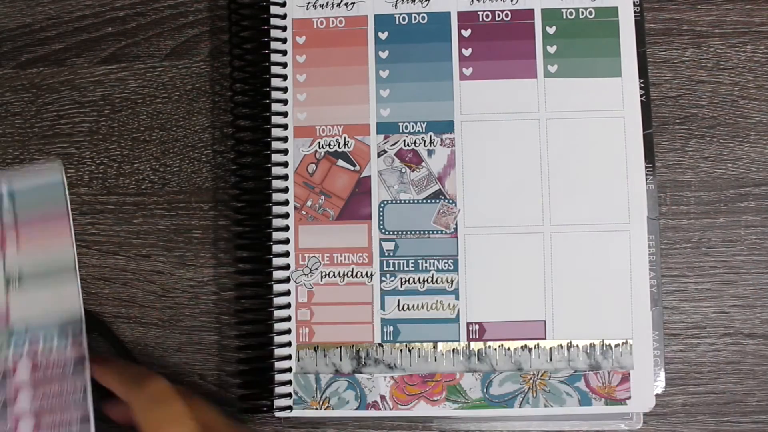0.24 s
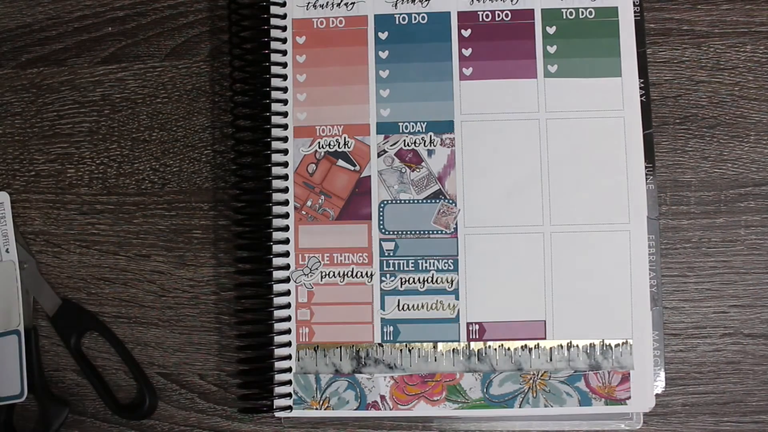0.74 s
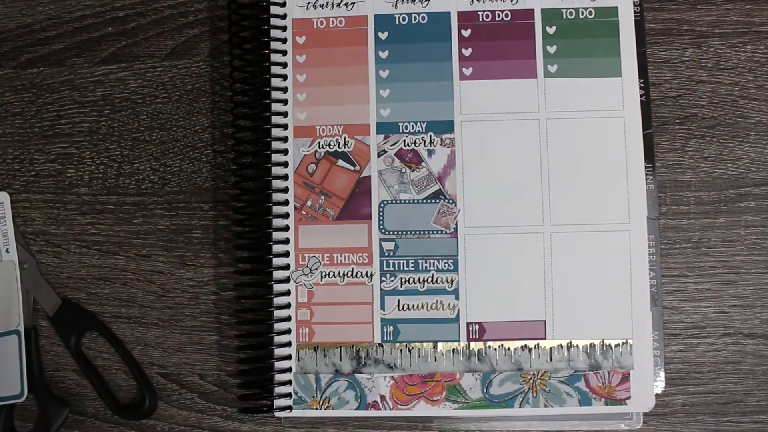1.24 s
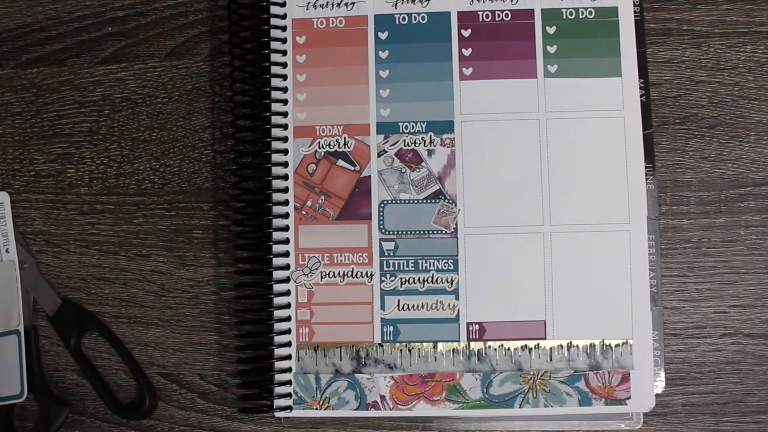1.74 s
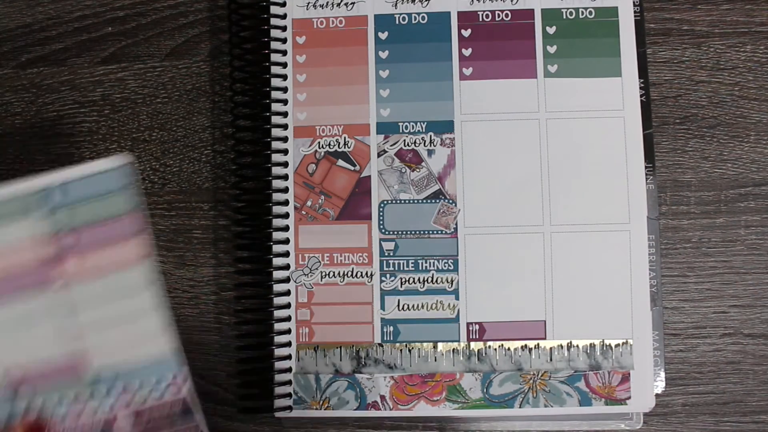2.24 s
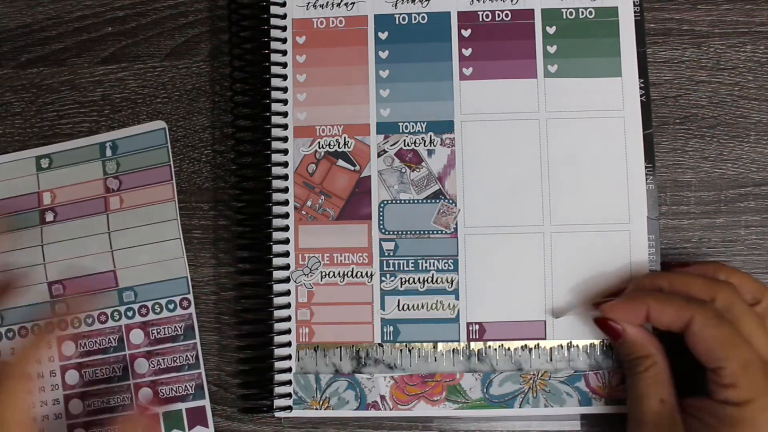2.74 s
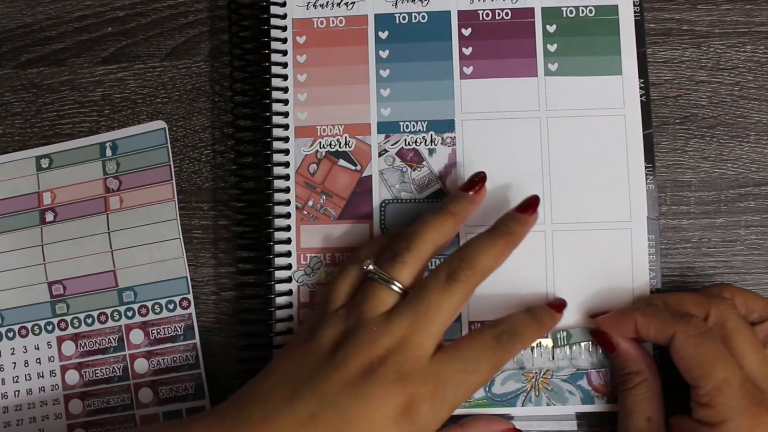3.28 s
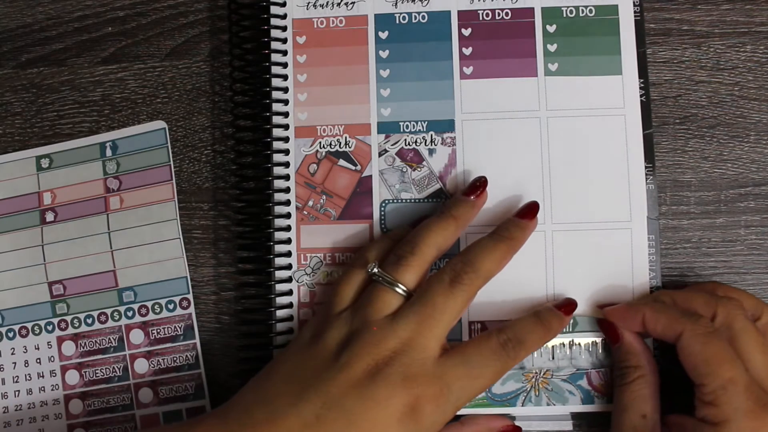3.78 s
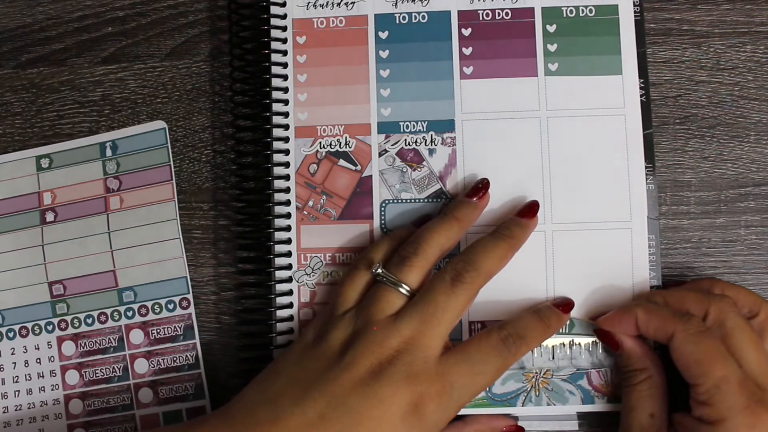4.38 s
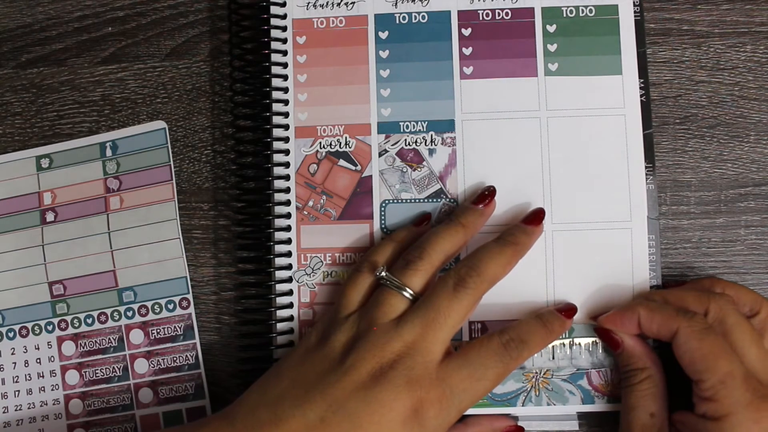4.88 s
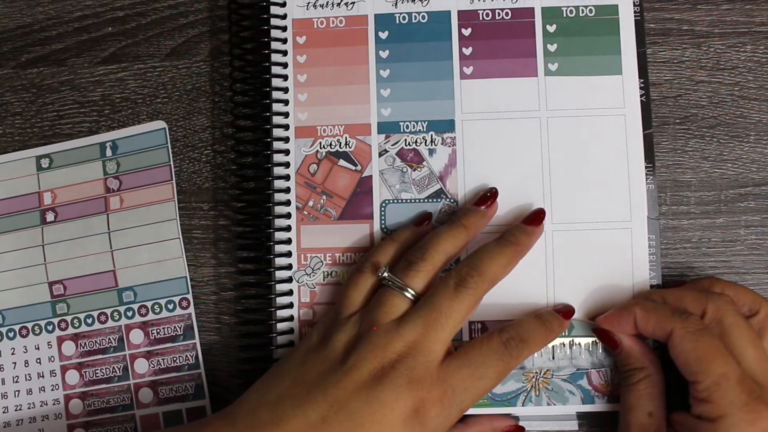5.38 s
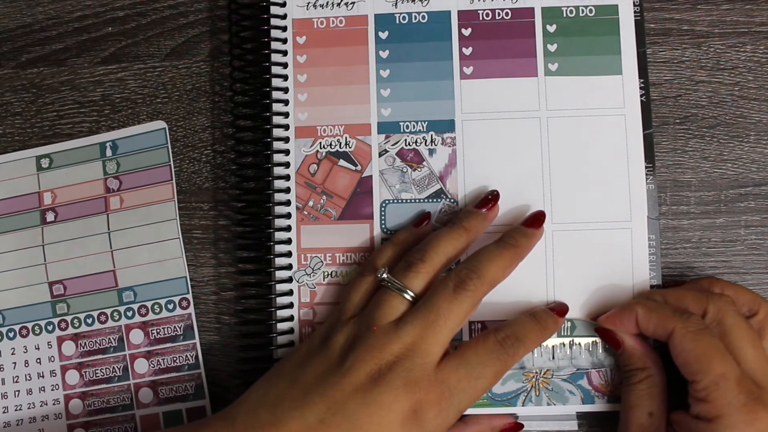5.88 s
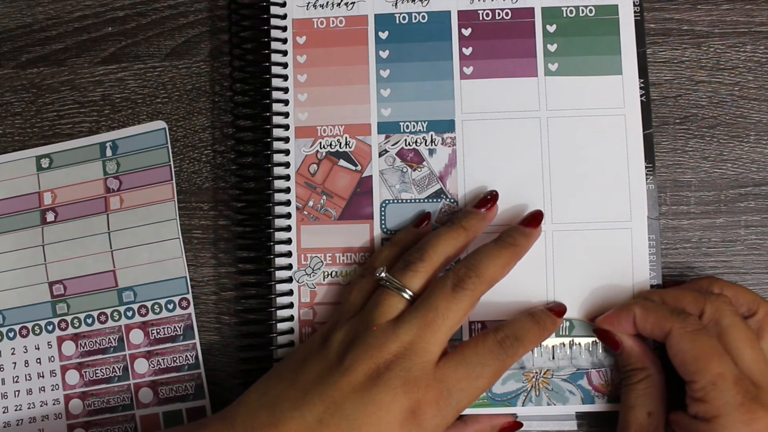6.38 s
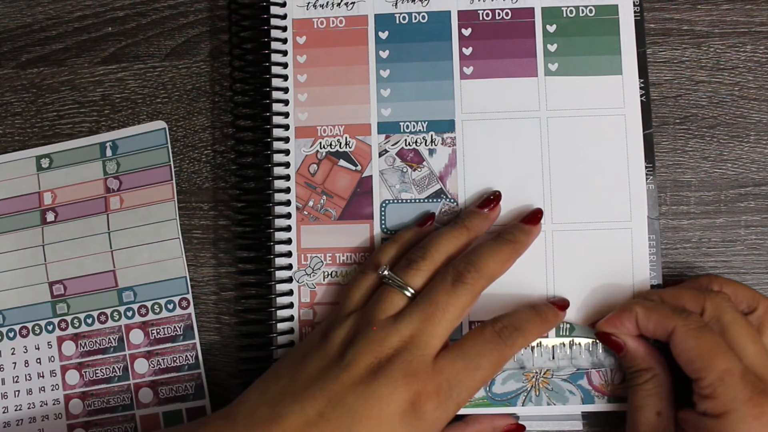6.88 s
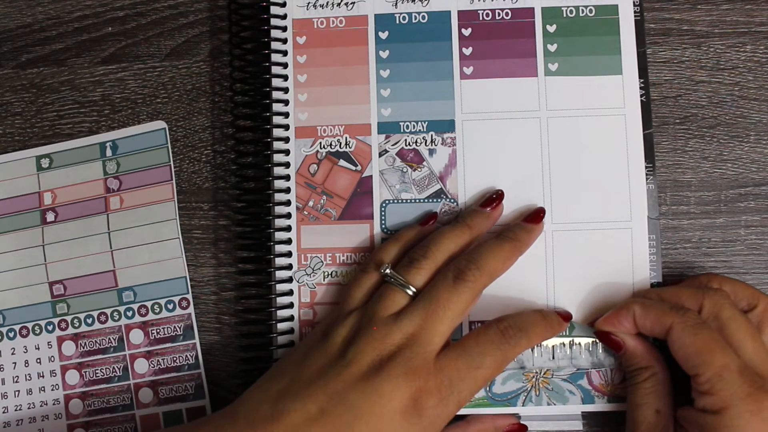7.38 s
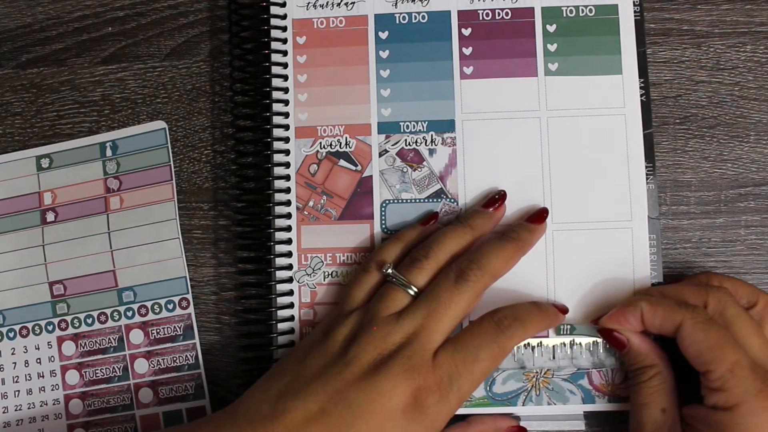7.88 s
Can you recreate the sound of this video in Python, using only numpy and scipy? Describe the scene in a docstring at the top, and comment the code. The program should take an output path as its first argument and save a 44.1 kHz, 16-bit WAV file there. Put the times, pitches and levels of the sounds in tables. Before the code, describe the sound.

A quiet small furnished room, heard close up, with a steady low fan, faint mains hum and light hiss throughout. From 0 to 0.55 seconds stiff sticker sheets rub and flex in quick papery strokes with crisp snaps. A bright sharp tap lands at 0.93, followed by a short rustle. A faint slide swells into a hollow knock on the desk near 1.5. Firm snaps and scrapes come at 1.9 and 2.1, then rustles and clicks from 2.3 to 2.6, fading by 3. Soft low rumble accompanies arm movements. Afterwards it is nearly still: fingernail ticks and sticky crackle around 3.25, fainter ones near 3.95, a bright tick at 4.55, another at 4.65, a small crackly cluster at 5.15, then a long gap. Single light ticks follow at 6.9 and 7.2, and a few tiny ones toward 7.9. The short room tail is barely noticeable.

```python
"""A fan, mains hum and faint hiss run throughout a quiet room, close under one microphone.
First sticker sheets are picked up, slid over each other and laid on a desk: filtered friction clicks make
the rubbing, and short noise bursts through resonances make the buckles, taps and, midway, a hollow knock.
Then fingernails lift and press a small sticker on a planner page: tiny resonant ticks and crackling adhesive.
Arm movements add soft low rumble while the sheets are handled."""
import sys
import numpy as np
from scipy import signal
from scipy.fft import rfft, irfft
from scipy.io import wavfile

SR = 44100
rng = np.random.default_rng(int(sys.argv[2]) if len(sys.argv) > 2 else 0)


def unload_audio(sound):
    """Save the sound as a 16-bit wav file, at the path given as the first command line argument."""
    columns = np.transpose(np.atleast_2d(sound))
    # keep every value between -1 and 1, then stretch to whole-number steps
    steps = np.round(np.clip(columns, -1, 1) * 32767)
    wavfile.write(sys.argv[1], SR, steps.astype(np.int16))


N = 358488
TIME = np.arange(N) / SR
FFT_SIZE = 2048
FREQS = np.arange(FFT_SIZE // 2 + 1) * SR / FFT_SIZE


def undb(db):
    """Logarithmic level: decibels become an amplitude ratio."""
    return 10 ** (np.asarray(db) / 20)


def unit(x):
    """Normalisation: scale to an rms of 1."""
    return x / np.sqrt(np.mean(x ** 2))


def spectrum(points):
    """Spectral envelope: (Hz, dB) points joined on a log-frequency axis."""
    hz, db = np.transpose(points)
    return np.interp(np.log(FREQS + 1), np.log(hz), db)


def colour(x, db):
    """Minimum-phase filtering: folding the cepstrum gives a causal filter with the given gain."""
    cepstrum = irfft(np.log(undb(db)))
    cepstrum[1:FFT_SIZE // 2] *= 2
    cepstrum[FFT_SIZE // 2 + 1:] = 0
    impulse_response = irfft(np.exp(rfft(cepstrum)))
    return signal.fftconvolve(x, impulse_response)[:len(x)]


def band(x, lo_hz, hi_hz):
    """Zero-phase band-pass: with no delay, neighbouring bands add up evenly."""
    edges = [lo_hz, min(hi_hz, SR / 2 - 100)]
    return signal.sosfiltfilt(signal.butter(3, edges, "band", fs=SR, output="sos"), x)


def walk(rate):
    """Slow random modulation: normal values, `rate` of them per second, joined by straight lines."""
    knots = rng.standard_normal(4096)
    return np.interp(TIME * rate, np.arange(len(knots)), knots)


def add(out, s, sound):
    """Superposition: mix a sound in at time s."""
    start = int(np.clip(s * SR, 0, N - len(sound)))
    out[start:start + len(sound)] += sound


# Colour of the moving air. Each row: frequency in Hz, relative power density in dB.
FAN_COLOUR = [(20, -17), (45, -14.5), (100, -13.5), (135, 0), (160, -3.5), (200, 1), (290, 0), (470, -8),
              (730, -4), (1000, -13), (1450, -15.5), (1750, -19), (3000, -28.5), (3800, -35.5)]


def fan_air(level_db=-47.5):
    """Turbulence noise: steady random air flow with most of its power at low frequencies."""
    return unit(colour(rng.standard_normal(N), spectrum(FAN_COLOUR))) * undb(level_db)


# Lines of the mains hum and the fan motor. Each row: frequency in Hz, level in dB rms.
HUM_LINES = [(60, -75), (120, -57.5), (208.5, -61), (417, -67)]


def hum():
    """Tonal excitation: mains and motor give steady sines whose phase wanders slowly."""
    out = np.zeros(N)
    for hz, db in HUM_LINES:
        phase = 2 * np.pi * hz * TIME + 0.82 * walk(2.31)
        out += np.sqrt(2) * undb(db) * np.sin(phase)
    return out


# Colour of the microphone's hiss. Each row: frequency in Hz, relative power density in dB.
HISS_COLOUR = [(100, -20), (2000, 6.5), (4500, 3.5), (7000, 1.5), (16000, 0.5)]


def microphone_hiss(level_db=-61):
    """Self-noise: the microphone adds an even, stationary hiss."""
    return unit(colour(rng.standard_normal(N), spectrum(HISS_COLOUR))) * undb(level_db)


# Colour of each channel's electronic noise. Each row: frequency in Hz, relative power density in dB.
CHANNEL_COLOUR = [(25, 12), (100, -13), (500, -3.5), (2000, -3), (16000, 5)]


def channel_noise(level_db=-63.0):
    """Electronic noise: a steady random signal for the difference between the channels."""
    return unit(colour(rng.standard_normal(N), spectrum(CHANNEL_COLOUR))) * undb(level_db)


# Edges of the bands in which a contact's level is set. Each entry: frequency in Hz.
CONTACT_EDGES_HZ = [200, 800, 2200, 5500, 10000, 16000]


def contact_bands(db, ring_hz, below, above, air_loss_db=6.5):
    """Resonant emphasis and absorption: loudest around the ring; paper soaks up the top band."""
    edges = np.array(CONTACT_EDGES_HZ)
    octaves = np.log2(np.sqrt(edges[1:] * edges[:-1]) / ring_hz)
    shape = np.where(octaves < 0, below * octaves, -above * octaves)
    shape[-1] -= air_loss_db
    return db + shape - shape.max()


def snap(band_db, modes, contact_s, flutter_s, flutter_db, edge=5.5):
    """Impact excitation: a sharp edge, a brief scrape and a weak flutter ring the paper's modes."""
    t = TIME[:FFT_SIZE]
    decay = np.exp(-t / contact_s) + undb(flutter_db) * np.exp(-t / flutter_s)
    push = rng.standard_normal(FFT_SIZE) * decay
    push[0] = edge
    ring_db = sum(db / (1 + (2 * (FREQS - hz) / width) ** 2) for hz, width, db in modes)
    sound = colour(push, ring_db + spectrum([(60, -23), (300, -4.5)]))
    edges = np.array(CONTACT_EDGES_HZ)
    centres = np.sqrt(edges[1:] * edges[:-1])
    attack = int(.006 * SR)
    # each band is scaled to its given level over the first 6 ms; done twice for accuracy
    for _ in range(2):
        power = 2 * np.abs(rfft(sound[:attack], FFT_SIZE)) ** 2 / (FFT_SIZE * attack)
        held_db = 10 * np.log10(np.histogram(FREQS, edges, weights=power)[0])
        sound = colour(sound, spectrum(np.c_[centres, band_db - held_db]))
    return sound


# Ringing of a bent sheet. Each row: frequency in Hz, width in Hz, emphasis in dB.
SHEET_RINGING = [(580, 510, 7.5), (1470, 46, 9), (2000, 470, 5.5), (2480, 690, 4.5), (4300, 730, 4),
                 (5840, 630, 1), (8270, 1700, 9)]
# Sheets buckling and tapping. Each row: start in seconds, level of the strongest band in dB before
# gain_db, ring in Hz, fall below the ring and fall above it in dB per octave, contact decay in seconds.
SHEET_SNAPS = [(0.0026, -29, 1360, 4.5, 5, 0.0029), (0.026, -34, 3400, 10, 12, 0.00076),
               (0.108, -39, 3060, 9, 19, 0.0025), (0.116, -34, 2920, 16, 29, 0.0066),
               (0.2087, -31, 2530, 10, 11, 0.00036), (0.2278, -32.5, 3160, 8, 4, 0.00067),
               (0.31, -31, 1040, 11.5, 17, 0.0014), (0.3135, -35.5, 980, 12, 9, 0.00079),
               (0.3973, -34.5, 1160, 10, 2.5, 0.00077), (0.4254, -39.5, 1274, 9, 1, 0.001),
               (0.4874, -35.5, 1280, 1, 13, 0.0014), (0.5027, -29.5, 575, 5, 10.5, 0.0009),
               (0.5129, -40, 1240, 11, 4.5, 0.00084), (0.891, -41, 1570, 12, 4.5, 0.001),
               (0.9127, -35.5, 1140, 11, 3, 0.001), (0.919, -34, 503, 7, 3, 0.0038),
               (0.9292, -24, 1800, 8, 17, 0.00074), (0.9334, -18.5, 4520, 8, 7.5, 0.0013),
               (0.9363, -35.5, 4440, -1, 3, 0.00094), (0.968, -43, 2100, 1, 8, 0.0011),
               (1.0241, -38.5, 7750, 0, 18, 0.0063), (1.0471, -33, 1040, 15, 13, 0.0055),
               (1.089, -39.5, 450, 1, 13, 0.0032), (1.381, -47, 1290, 10, 2, 0.0008),
               (1.8693, -42.5, 6200, 10, 7, 0.0011), (1.9046, -33, 2320, 3.5, 3, 0.0026),
               (1.908, -26.5, 1620, 4, 4.5, 0.00069), (2.0813, -22.5, 1540, 5.5, 8, 0.00077),
               (2.0912, -25.5, 1600, 3.5, 3, 0.00078), (2.127, -37, 8140, 4, -1, 0.0021),
               (2.2753, -34.5, 2510, 9, 6, 0.0025), (2.2838, -36, 1600, 2.5, 15, 0.0029),
               (2.4264, -48, 2350, 8, 8, 0.001), (2.4523, -35.5, 2700, 5, 6, 0.0012),
               (2.4624, -35, 1610, 6, 6, 0.0023), (2.484, -29, 850, 14, 11, 0.0022),
               (2.495, -36, 2210, 7, 4, 0.005), (2.504, -35, 2560, 12, 21, 0.0025),
               (2.562, -45, 2300, 7, 11, 0.001), (2.568, -28.5, 4170, 5, 12, 0.00093),
               (2.5783, -30.5, 2620, 10, 14, 0.00084), (2.6137, -38, 2240, 4, 9, 0.0033),
               (2.667, -46, 2700, 5, 8, 0.0011), (2.8274, -50, 3900, 1, 8, 0.00058),
               (2.8625, -40.5, 1980, 7, 4.5, 0.00079), (2.882, -42, 4230, 8, 14, 0.00053),
               (2.964, -38.5, 4370, 10, 28, 0.0048), (2.9826, -44, 2800, 8, 6, 0.00092),
               (2.995, -41.5, 2600, 10, 7, 0.00083)]


def snaps(gain_db=0.05, ring_db=8, ring_share=0.27):
    """Modal resonance: each snap rings the sheet, with a pitch set by how it is bent just then."""
    out = np.zeros(N)
    for s, db, ring_hz, below, above, contact_s in SHEET_SNAPS:
        modes = list(SHEET_RINGING) + [(ring_hz, ring_share * ring_hz, ring_db)]
        band_db = contact_bands(db + gain_db, ring_hz, below, above)
        add(out, s, snap(band_db, modes, contact_s, flutter_s=0.0074, flutter_db=-10.5))
    return out


def slips(rate, spread_db):
    """Stick-slip: fibres catch and let go in random clicks, a few far larger than the rest."""
    size = undb(spread_db * np.minimum(rng.exponential(size=N), 4))
    happens = rng.random(N) < rate / SR
    return unit(happens * size * rng.choice([-1, 1], N))


def stroke(start, length, swell_db, attack_s=0.013, release_s=0.0097):
    """Friction envelope: a sheet gets moving, swells or fades evenly in dB, and comes to rest."""
    along = np.clip((TIME - start) / length, 0, 1)
    before = np.maximum(start - TIME, 0) / attack_s
    after = np.maximum(TIME - start - length, 0) / release_s
    return undb(swell_db * (along - .5)) * np.exp(-np.minimum(before + after, 20))


# Colour of the rubbed sheet. Each row: frequency in Hz, relative gain in dB.
SHEET_COLOUR = [(100, -10.5), (300, -4.5), (800, -5.5), (1200, -2), (1550, -2), (2600, -2), (3600, -3.5),
                (4300, -3.5), (6300, -7), (8500, -4.5), (10500, -17), (14000, -15.5), (16000, -23)]
# Strokes of sheet sliding on sheet. Each row: start in seconds, length in seconds, level in dB before the
# trims below, swell from start to end in dB, flexing body and edge hiss in dB relative to that level.
SLIDING_STROKES = [(0.042, 0.045, -34.5, -1, -8, -15.5), (0.08, 0.24, -42.5, -1, -7, -12.5),
                   (0.275, 0.034, -39.5, 1, -10, -15), (0.325, 0.12, -44.5, 4, -2.5, -11.5),
                   (0.465, 0.037, -39, 0, -2.5, -10), (0.52, 0.28, -48.5, 2, -6, -10),
                   (0.81, 0.09, -54.5, 3, 0.5, -10), (0.91, 0.02, -44, -6, -11, -11),
                   (1.025, 0.033, -38, -4, -9, -12), (1.06, 0.16, -45, -6, -4.5, -13),
                   (1.35, 0.12, -57.5, 21, 4, -17), (1.48, 0.29, -52, 1, -0.5, -14),
                   (1.845, 0.04, -48, 2, -6, -14), (1.901, 0.015, -36.5, -2, -7, -18),
                   (1.917, 0.028, -32, 3, -10, -11.5), (2.093, 0.016, -34.5, 0, -6, -13),
                   (2.192, 0.049, -42.5, -1, -9.5, -14), (2.279, 0.024, -32.5, 4.5, -3.5, -11.5),
                   (2.32, 0.11, -54, -16, -4, -10), (2.462, 0.056, -40, -7, -8, -13),
                   (2.572, 0.012, -45, -4, 1, -9), (2.68, 0.0072, -51.5, 4, -15, -2),
                   (2.835, 0.17, -53, -1, -1, -11), (2.962, 0.014, -46, -2, -8, -16)]
# The held sheets graze each other faintly, under the strokes and on after them. One row: the same
# columns as the strokes.
HELD_GRAZE = (1.2, 2.5, -59.5, -4, -1.5, -13)


def sliding(body_db=-1, rub_db=-2.63, judder_db=1.5, patchy_db=2.0, pressure_db=0.5, catch_db=-8):
    """Friction-driven vibration: dense slips make the face rub, the body flex and the edge hiss."""
    power = np.zeros((3, N))
    for start, length, db, swell_db, flex_db, edge_db in list(SLIDING_STROKES) + [HELD_GRAZE]:
        levels_db = [[db + flex_db], [db], [db + edge_db]]
        power += undb(levels_db) ** 2 * stroke(start, length, swell_db) ** 2
    flexing, rubbing, hissing = np.sqrt(power)
    fibres = slips(rate=9000, spread_db=2.0)
    # sticker edges catch in a coarser crackle, about 130 clicks a second
    edge_crackle = slips(rate=130, spread_db=1.0)
    friction = fibres + undb(catch_db) * edge_crackle
    rub = colour(friction, spectrum(SHEET_COLOUR)) * undb(judder_db * walk(140))

    def patches(lo_hz, hi_hz, count):
        """Independent modulation: neighbouring resonances swell and fade as the sheet bends."""
        edges = np.geomspace(lo_hz, hi_hz, count + 1)
        return unit(sum(band(rub, lo, hi) * undb(patchy_db * walk(45)) for lo, hi in zip(edges, edges[1:])))

    body = patches(143, 2150, count=7) * undb(body_db) * flexing
    face = patches(2130, 9600, count=9) * undb(rub_db) * rubbing
    hiss = patches(9440, 17000, count=2) * hissing
    return (body + face + hiss) * undb(pressure_db * walk(25.02))


# Arm movements that push air and desk. Each row: peak time in seconds, level in dB before gain_db,
# half length in seconds (where the power is down to 1/e).
ARM_MOVES = [(0.167, -60, 0.11), (0.47, -55, 0.06), (0.87, -53, 0.05), (1.02, -62, 0.15), (1.58, -65, 0.22),
             (2.28, -57, 0.04), (2.47, -56, 0.047), (2.74, -58, 0.05), (2.93, -66, 0.25)]


def handling(gain_db=1.0):
    """Low-frequency excitation: soft rumble swells and fades with each movement of the arms."""
    power = sum(undb(db) ** 2 * np.exp(-((TIME - s) / half_s) ** 2) for s, db, half_s in ARM_MOVES)
    rumble = unit(band(rng.standard_normal(N), 22, 125))
    return rumble * np.sqrt(power) * undb(gain_db)


# The stack of sheets knocked on the desk. One row: level of the strongest band in dB, frequency in Hz
# around which it is loudest, fall below and fall above that frequency in dB per octave.
STACK_KNOCK = (-20, 2700, 0.2, 10)
# Ringing of that stack. Each row: frequency in Hz, width in Hz, emphasis in dB.
STACK_RINGING = [(446, 550, 26), (1110, 67, -5), (1450, 130, 9), (1910, 600, 15.5), (3200, 260, 13.5),
                 (4250, 600, 5), (8000, 1600, 15)]


def knock(start_s=1.4728, flutter_db=-19, flutter_s=0.0092, contact_s=0.00051):
    """Impact resonance: the stack's edge meets the desk with a short, hollow knock."""
    out = np.zeros(N)
    band_db = contact_bands(*STACK_KNOCK)
    add(out, start_s, snap(band_db, STACK_RINGING, contact_s, flutter_s, flutter_db, edge=3.1))
    return out


# Ringing of the page held down by the hand. Each row: frequency in Hz, width in Hz, emphasis in dB.
PAGE_RINGING = [(1080, 320, 14), (2860, 1100, 7.5), (3720, 430, -8), (4800, 580, 8), (8200, 1800, 2),
                (13700, 1800, -5)]
# Fingernails and the sticker's edge on the page. Each row: start in seconds, level of the strongest band
# in dB before gain_db, ring in Hz, fall below the ring and fall above it in dB per octave.
PAGE_TICKS = [(3.232, -44, 2090, 8, 12), (3.2703, -43, 3100, 7, 4), (3.786, -53.5, 3960, 5, 10),
              (3.9766, -52.5, 4780, -1, -2), (4.5536, -35, 7900, 8, 2), (4.663, -43, 3160, 6, 1.5),
              (5.1401, -42, 2520, 12, 8), (5.1647, -44.5, 2670, 9, 12), (5.2124, -52, 3190, 7, 15),
              (5.3619, -52, 3180, 2, 4.5), (6.8981, -39, 8350, 5.5, -2), (7.1999, -49.5, 4400, 12, -1),
              (7.339, -62, 4800, 7, 5), (7.666, -60.5, 4800, 5, -3), (7.7617, -59, 4400, 5, 3),
              (7.776, -53.5, 5020, 0, -4), (7.8581, -40, 4610, 2.5, 11.5), (7.912, -50, 2520, 6, -0.5)]


def nail_ticks(gain_db=0.7, ring_db=7, ring_share=0.31):
    """Point excitation: tiny hard contacts ring the flat page; the spot touched favours one pitch."""
    out = np.zeros(N)
    for s, db, ring_hz, below, above in PAGE_TICKS:
        modes = list(PAGE_RINGING) + [(ring_hz, ring_share * ring_hz, ring_db)]
        band_db = contact_bands(db + gain_db, ring_hz, below, above)
        add(out, s, snap(band_db, modes, contact_s=0.00046, flutter_s=0.0066, flutter_db=-10.5))
    return out


# Colour of adhesive crackling in the page. Each row: frequency in Hz, relative gain in dB.
ADHESIVE_COLOUR = [(300, -12), (1000, -6), (1700, -10.5), (2300, -0.5), (3000, -1), (3500, -9),
                   (4000, -6.5), (4600, -2), (5200, -8.5), (5700, -11.5), (8500, -11), (11000, -22),
                   (13500, -15), (16000, -21)]
# Short pulls on the adhesive. Each row: peak time in seconds, level in dB, rise and fall in dB per second.
ADHESIVE_PULLS = [(3.24, -40.5, 900, 400), (3.273, -41.5, 600, 800), (3.33, -61, 56, 58),
                  (3.89, -58, 100, 90), (3.955, -44.5, 450, 500), (5.125, -45.5, 700, 156),
                  (5.165, -45, 400, 350), (5.42, -66, 70, 200), (7.2, -46, 580, 900),
                  (7.33, -64.5, 100, 34), (7.87, -64, 50, 90)]


def peeling(judder_db=5.0):
    """Fracture noise: adhesive threads break one by one under the nail; each pull builds and lets go."""
    pulls = [db - np.maximum(rise * (s - TIME), fall * (TIME - s)) for s, db, rise, fall in ADHESIVE_PULLS]
    pull_db = np.max(pulls, axis=0)
    crackle = colour(slips(rate=1200, spread_db=3.0), spectrum(ADHESIVE_COLOUR))
    return unit(crackle * undb(judder_db * walk(110))) * undb(pull_db)


def room(x, t60_s=0.21, wet_db=-19, damp_hz=6500):
    """Reverberation: a small furnished room answers with a short, duller, decaying tail."""
    t = TIME[:SR // 2]
    tail = rng.standard_normal(len(t)) * undb(-60 * t / t60_s) * (t > .006)
    tail = colour(tail, -10 * np.log10(1 + (FREQS / damp_hz) ** 2))
    return x + undb(wet_db) * signal.fftconvolve(x, tail / np.linalg.norm(tail))[:N]


def scene():
    """Sum and difference: all sources sit in the centre; only electronic noise parts the channels."""
    background = fan_air() + hum() + microphone_hiss()
    contacts = snaps() + sliding() + knock() + nail_ticks() + peeling()
    centre = background + room(contacts) + handling()
    side = channel_noise()
    return np.array([centre + side, centre - side])


def record(dry):
    """Band limiting: the recorder cuts the top with a steep low-pass."""
    low_pass = signal.ellip(10, .1, 80, 15850, fs=SR, output="sos")  # ripple dB, stop-band dB, cutoff Hz
    return signal.sosfilt(low_pass, dry)


dry = scene()
out = record(dry)
unload_audio(out)
```